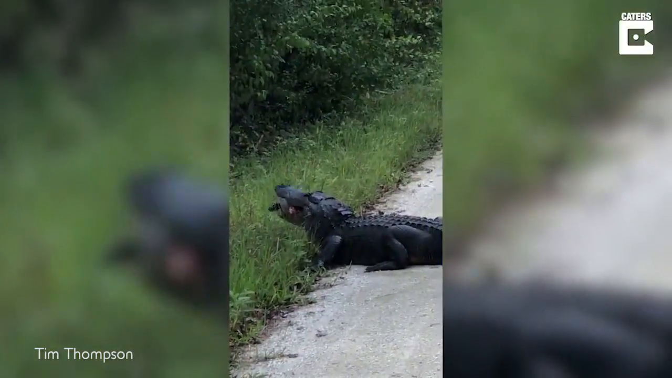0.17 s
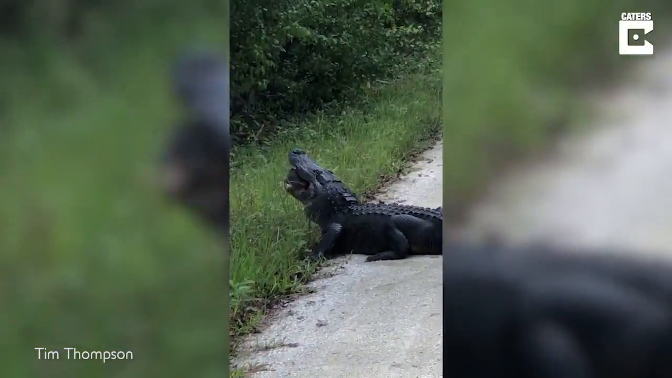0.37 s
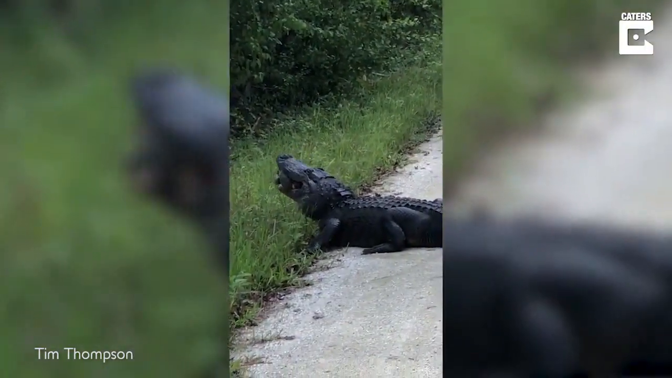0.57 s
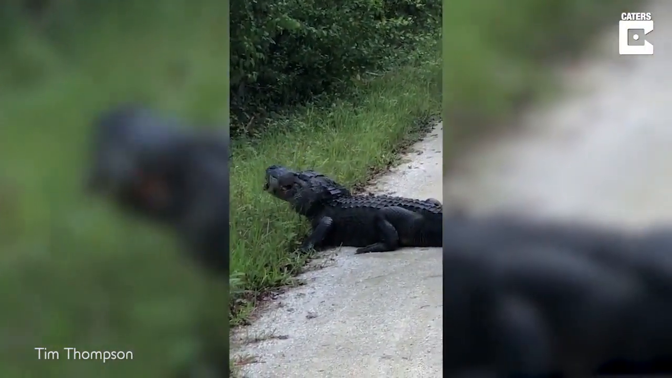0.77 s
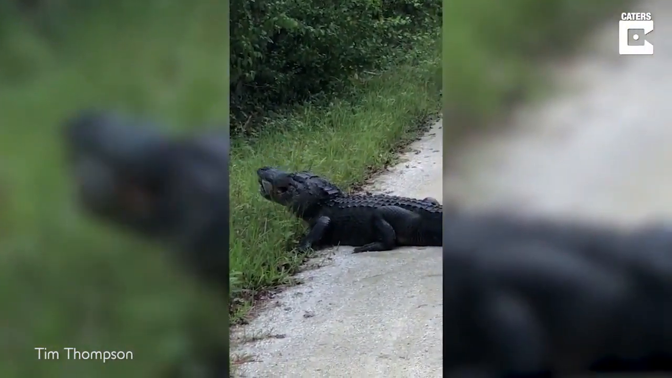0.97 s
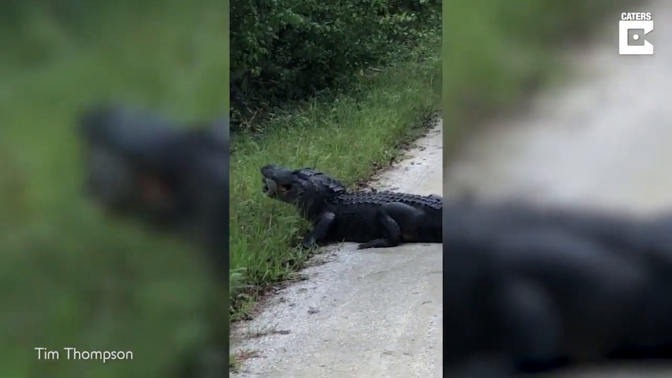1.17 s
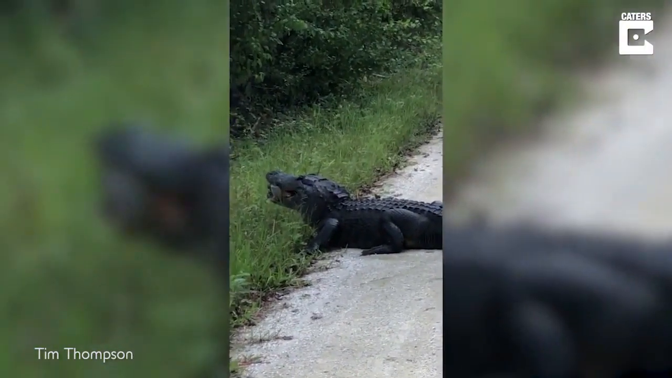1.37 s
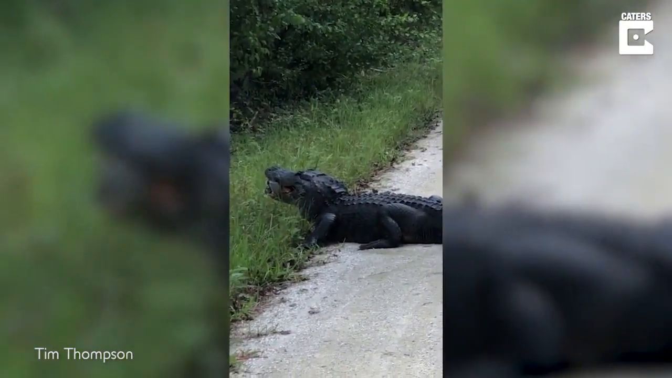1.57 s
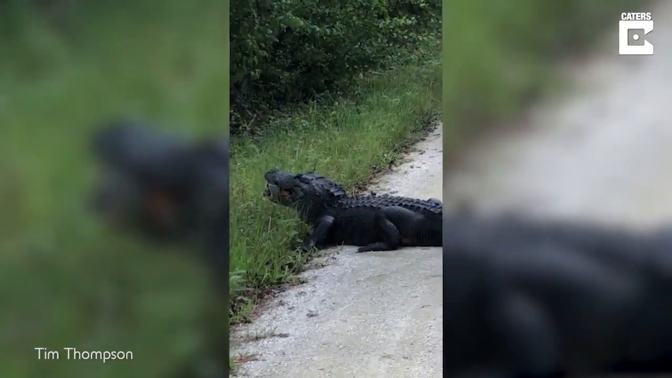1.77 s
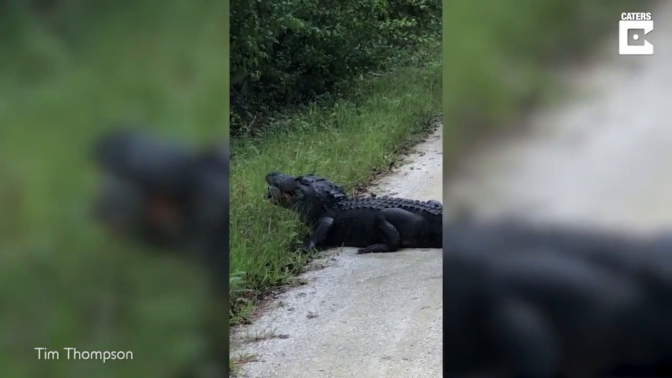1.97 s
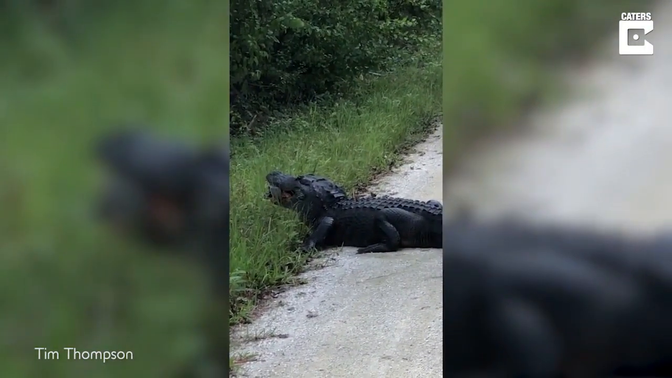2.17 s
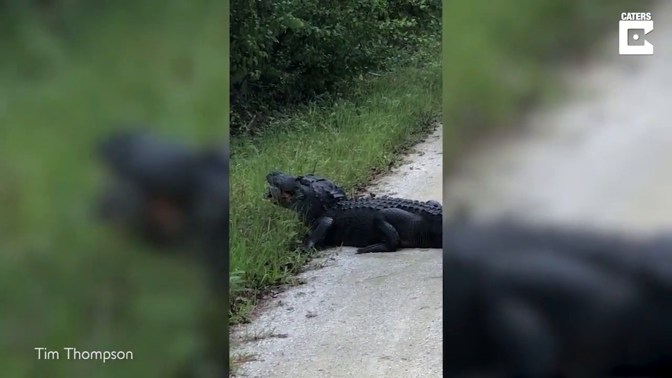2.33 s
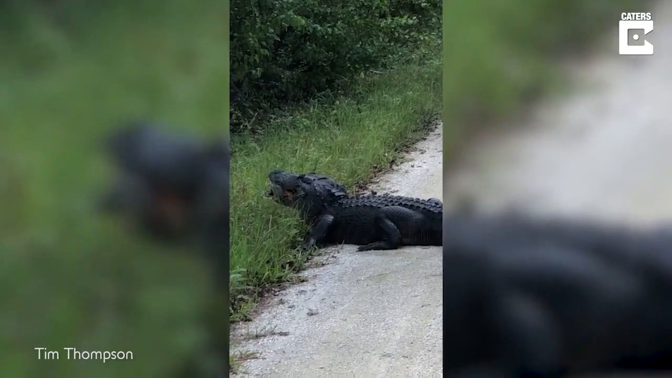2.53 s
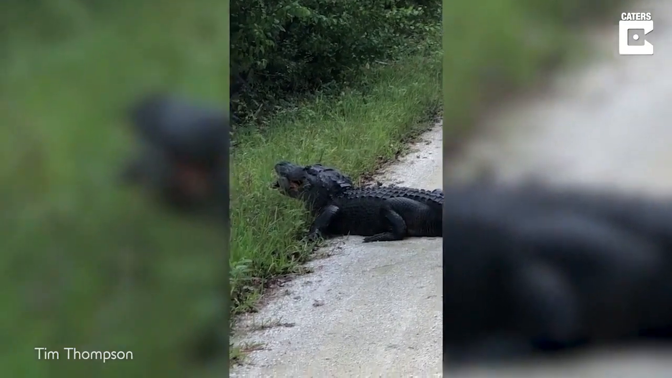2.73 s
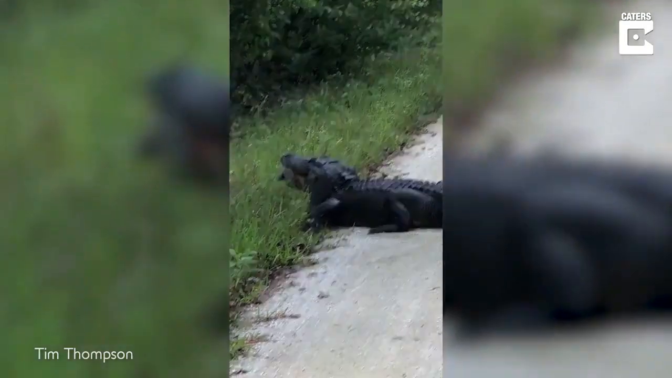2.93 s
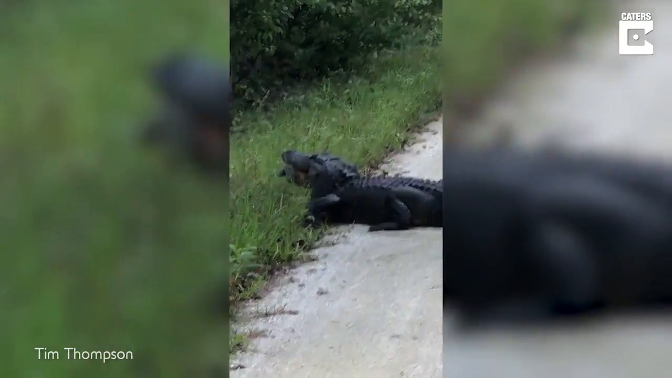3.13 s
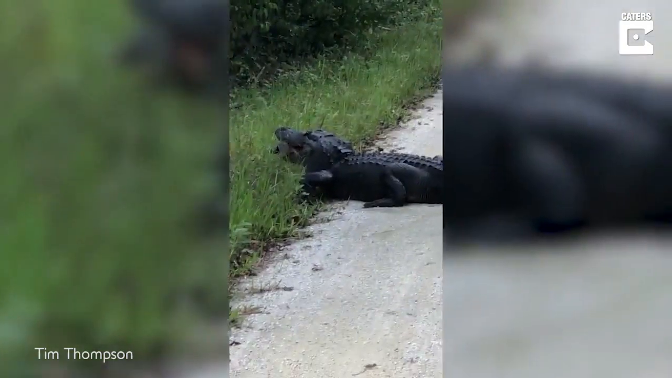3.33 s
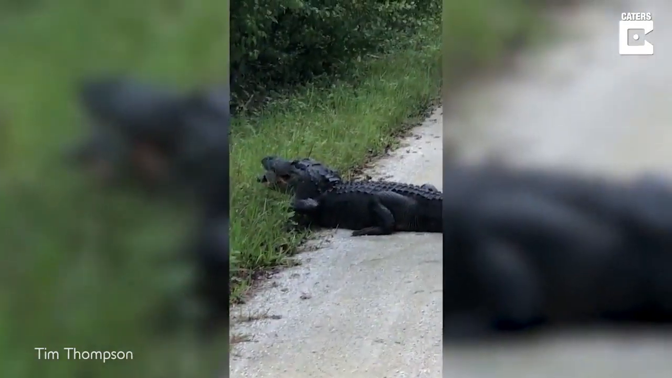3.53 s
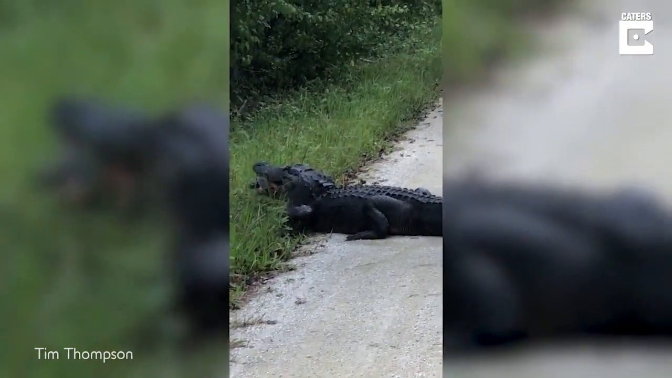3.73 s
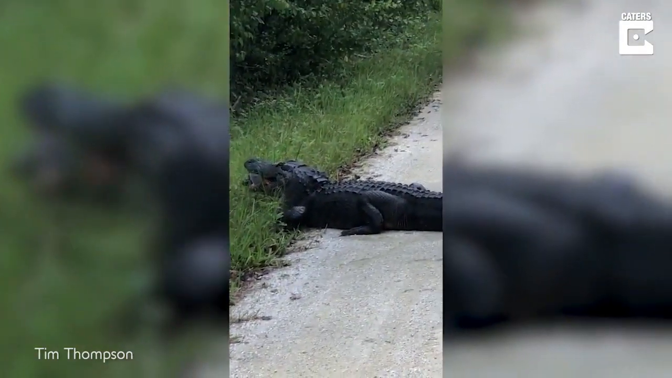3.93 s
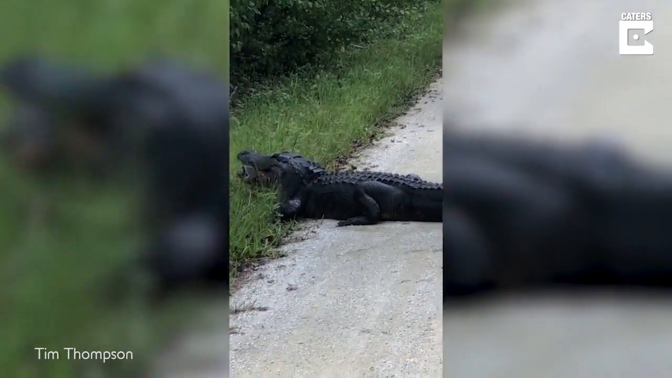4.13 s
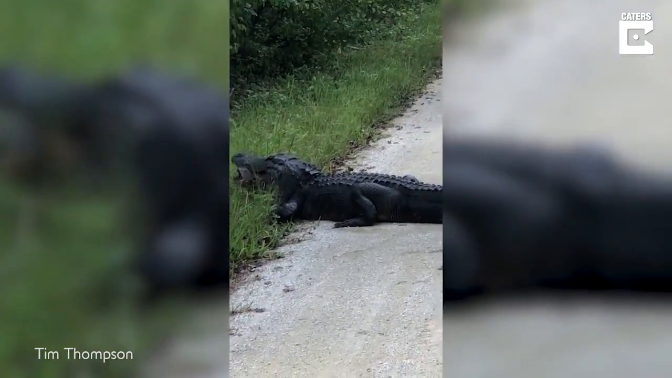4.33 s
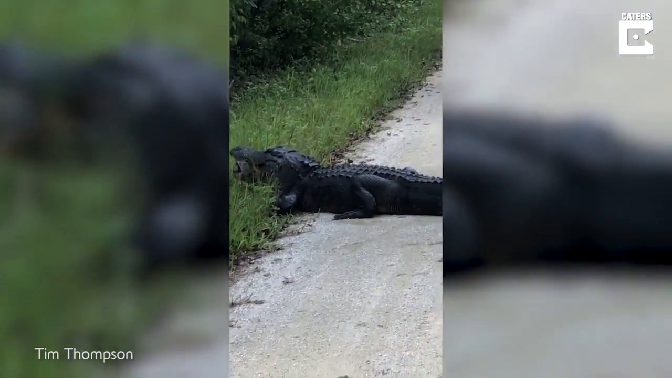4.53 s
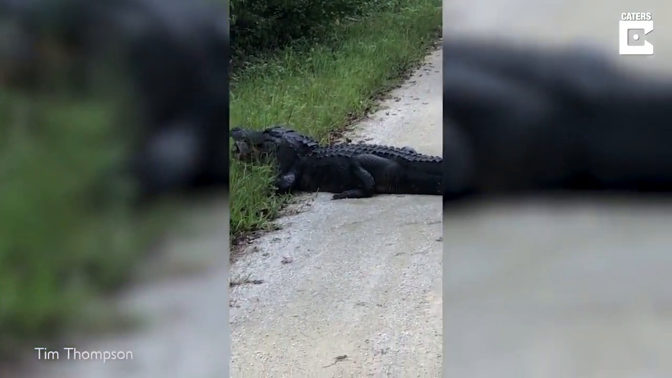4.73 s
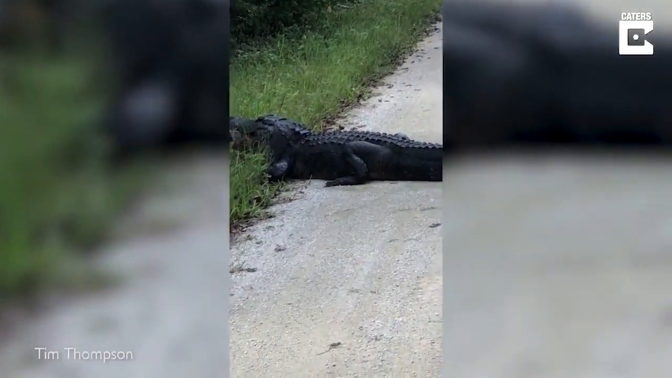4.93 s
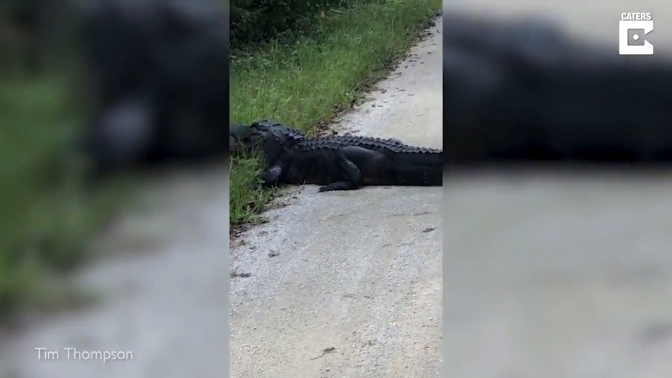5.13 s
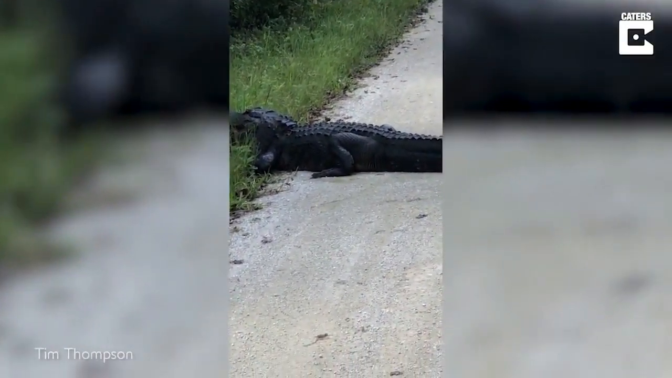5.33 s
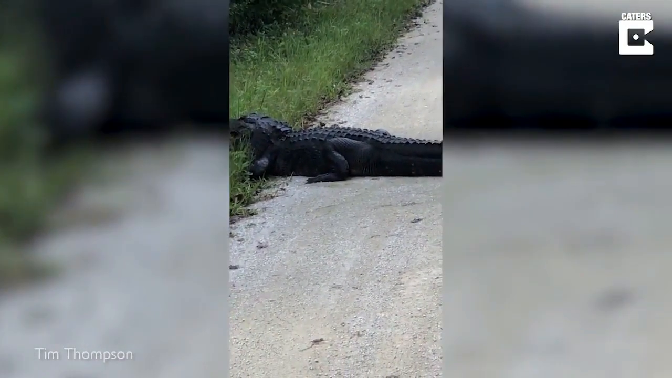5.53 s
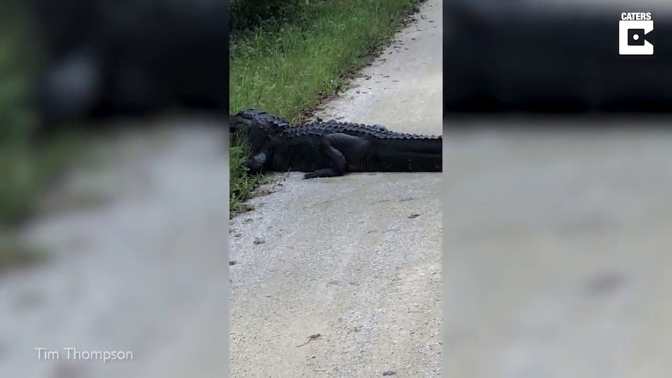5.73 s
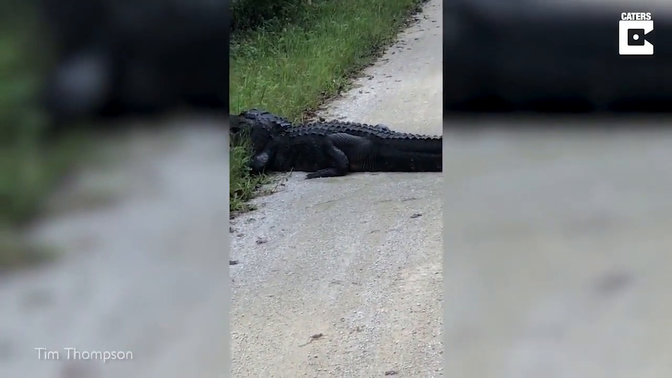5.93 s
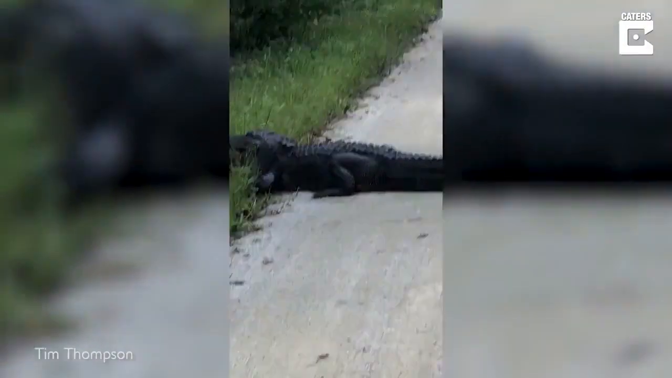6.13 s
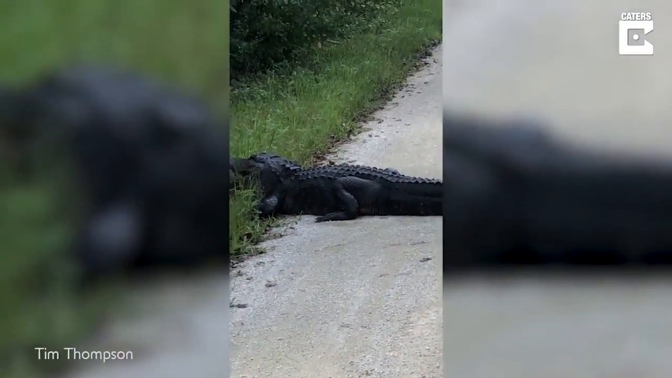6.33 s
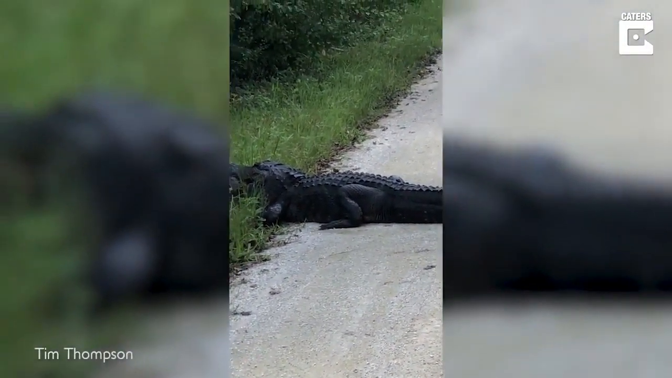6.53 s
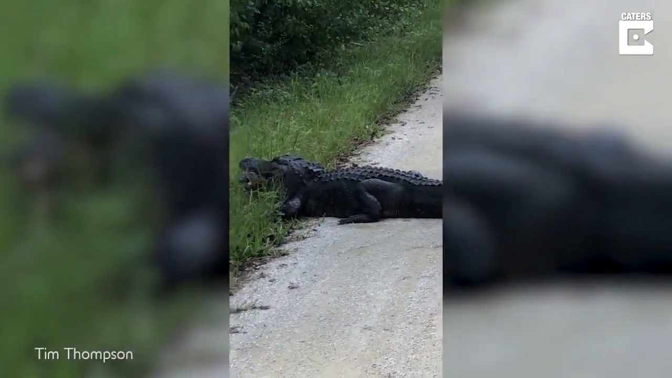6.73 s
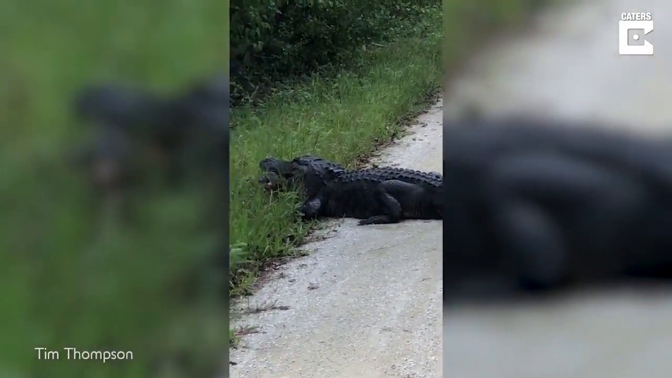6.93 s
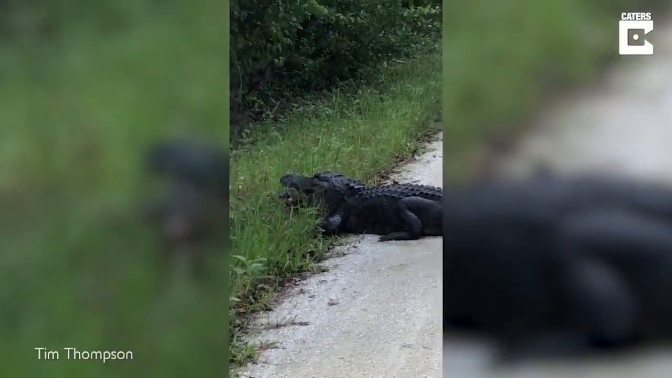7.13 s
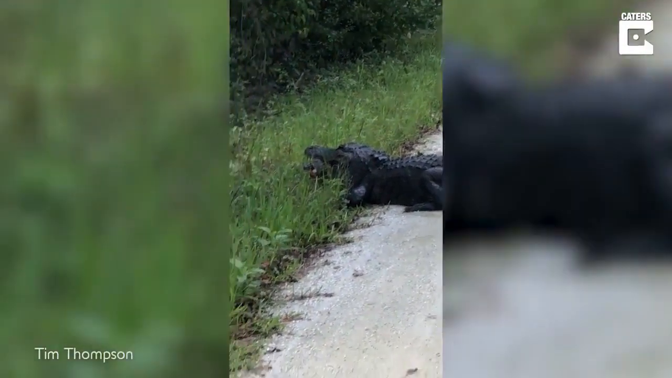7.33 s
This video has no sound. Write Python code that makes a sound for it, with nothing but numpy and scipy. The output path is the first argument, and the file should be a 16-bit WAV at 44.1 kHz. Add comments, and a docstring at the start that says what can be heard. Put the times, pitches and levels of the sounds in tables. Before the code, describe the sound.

Outdoors on a gravel roadside, an alligator bites through a turtle shell: a few small ticks, then a very sharp loud crack and a second hollower crunch with splintering debris, both thrown back briefly by nearby trees. Afterwards only a quiet car idle remains, low throb, soft clatter and fan roar, with a short faint grass rustle. The engine is close to the microphone; the animal is a little farther away.

```python
"""An alligator on a gravel roadside bites through a turtle shell: small snaps, then two hard cracks
that the trees throw back. Noise bursts ring shell modes, a pulse rings the hollow, a noise tail echoes.
Grass rustles later as band-split random grains; a few stalks snap as short noise bursts.
A six-cylinder car idles close by: cosine exhaust throb, ringing valve-gear clatter, shaped-noise
fan roar and a lone swept hum."""
import sys
import numpy as np
from scipy import signal
from scipy.fft import rfft, irfft, next_fast_len
from scipy.io import wavfile

SR = 44100
rng = np.random.default_rng(int(sys.argv[2]) if len(sys.argv) > 2 else 0)


def log_audio(samples):
    """Write samples as a 16-bit WAV file to the path given in sys.argv[1]."""
    # one column per channel
    frames = np.atleast_2d(samples).T
    # limit to full scale, then quantise
    limited = np.clip(frames, -1, 1)
    pcm = np.round(limited * 32767).astype(np.int16)
    wavfile.write(sys.argv[1], SR, pcm)


N = 325899


def from_db(db):
    """dB to gain."""
    return 10 ** (np.asarray(db) / 20)


def rms_one(x):
    """Scale to rms 1."""
    return x / np.sqrt(np.mean(x ** 2) + 1e-20)


def peak_one(x):
    """Scale to peak 1."""
    return x / np.abs(x).max()


def in_time(rows):
    """Columns of a curve table, interpolated at every sample."""
    row_s, *columns = np.transpose(rows)
    return [np.interp(np.arange(N) / SR, row_s, column) for column in columns]


def drift(rate_hz):
    """Slow random wander of spread 1: low-passed noise at SR / 40, interpolated."""
    pole = np.exp(-80 * np.pi * rate_hz / SR)
    noise = rng.standard_normal(N // 40 + 2002)
    slow = signal.lfilter([1], [1, -2 * pole, pole * pole], noise)[2000:]   # drop the run-in
    return np.interp(np.arange(N) / 40, np.arange(len(slow)), rms_one(slow))


def ring(clicks, hz, t60_s):
    """Two-pole resonator: a unit click sets a decaying sine of height 1 ringing."""
    radius = 10 ** (-3 / (t60_s * SR))
    angle = 2 * np.pi * hz / SR
    feedback = [1, -2 * radius * np.cos(angle), radius * radius]
    return signal.lfilter([0, np.sin(angle)], feedback, clicks + 1e-18)


def coloured(x, spectrum, peaks=()):
    """Give x a spectrum, straight in dB over log frequency, with resonance peaks on top; rms 1."""
    size = next_fast_len(N)
    bins_hz = np.arange(size // 2 + 1) * SR / size + 1
    curve_hz, curve_db = np.transpose(spectrum)
    power = from_db(2 * np.interp(np.log(bins_hz), np.log(curve_hz), curve_db))
    for hz, width_hz, db in peaks:
        power += from_db(2 * db) / (1 + (2 * (bins_hz - hz) / width_hz) ** 2) ** 2
    return rms_one(irfft(rfft(x, size) * np.sqrt(power), size)[:N])


def band_pass(x, low_hz, high_hz):
    """Second-order Butterworth band."""
    return signal.sosfilt(signal.butter(2, [low_hz, high_hz], "band", fs=SR, output="sos"), x)


# Shell plate modes. Each row: nominal frequency in Hz, relative level in dB, t60 in seconds.
SHELL_MODES = [(1420, -1.5, 0.0052), (1720, -8.5, 0.014), (2470, -5, 0.0078), (3260, -3.5, 0.0077),
               (3775, 1, 0.0047), (4170, -1, 0.0015), (5240, -1, 0.0036), (5500, -0.5, 0.00313),
               (7080, 4, 0.0035), (9200, -1, 0.003), (11600, 1.5, 0.001), (13500, 1, 0.00155)]
MODE_SPREAD = 0.02   # share by which each break shifts the modes, as it loads the plates differently
TEAR_S = 0.0001   # time constant of fracture build-up


def shell_snap(t, centre_hz, length_s, fall_db):
    """A fracture is a short burst of breaks that rings the plate modes near its centre; peak 1."""
    fracture = (1 - np.exp(-t / TEAR_S)) * np.exp(-(t / max(1.5 * length_s, 1e-4)) ** 2)
    breaks = rng.standard_normal(len(t)) * fracture
    shift = 1 + MODE_SPREAD * rng.standard_normal(len(SHELL_MODES))
    modes = 0
    for k, (hz, level_db, t60_s) in enumerate(SHELL_MODES):
        gain = from_db(level_db - fall_db * abs(np.log2(hz / centre_hz)))
        modes = modes + gain * peak_one(ring(breaks, hz * shift[k], t60_s)) * (-1) ** k
    bare_crack = signal.lfilter([1, 0, -1], [1, 0, .1], breaks)   # adds even treble
    return peak_one(peak_one(modes) + from_db(-3 - fall_db) * bare_crack)


# Air modes inside the shell. Each row: frequency in Hz, relative drive in dB, t60 in seconds.
HOLLOW_MODES = [(633, 10, 0.045), (580, 8, 0.032), (874, 3.5, 0.032), (1180, -3, 0.0098), (1400, 0, 0.014),
                (490, -9, 0.025), (361, 0, 0.049)]
HOLLOW_LAG_S, HOLLOW_SWELL_S = 0.00153, 0.0025   # answers after the first break; swell time constant


def shell_hollow(t):
    """The hollow booms when the plate gives way: one pressure pulse rings the air modes; peak 1."""
    release = np.exp(-((t - HOLLOW_LAG_S) / 0.000073) ** 2)
    push = np.diff(release, prepend=0)
    boom = sum(from_db(level_db) * ring(push, hz, t60_s) for hz, level_db, t60_s in HOLLOW_MODES)
    swell = 1 - np.exp(-np.maximum(t - HOLLOW_LAG_S, 0) / HOLLOW_SWELL_S)
    return peak_one(boom * swell)


# Fractures. Each row: start in seconds, snap peak in dB, snap centre in Hz, burst length in seconds
# (before a stretch of 1.5), fall-off from the centre in dB per octave, hollow against snap peak in dB,
# click sent to the trees against snap peak in dB.
BITES = [(.5222, -54, 5000, 0.00067, 18, -10, -12), (.5434, -62, 8000, 0.0008, 14, -25, -22),
         (0.553, -50, 3050, 0.0013, 20, -25, -17), (0.5779, -33, 3830, 0.00043, 15, -9, -22.5),
         (.5866, -45.5, 3380, 0.00097, 21, -2, -23), (.5897, -45, 3600, 0.0008, 19, -11, -32),
         (0.6884, -50, 6170, 0.00062, 36, -28, -13), (.781, -51, 3400, 0.0023, 22, -30, -28),
         (0.797, -27, 3400, 0.0007, 19, -15.5, -19.5), (.8064, -39, 2940, 0.0029, 21, -9, -30),
         (.8125, -40, 3600, 0.0022, 16, -17, -20), (.8172, -29.5, 3500, 0.00084, 12, -14, -23),
         (.822, -39, 3500, 0.00067, 14, -13, -31), (0.8386, -29.5, 5000, 0.0014, 9, -36, -18.5),
         (0.8493, -31, 3700, 0.00058, 12, -30, -21), (0.8561, -9.5, 3170, 0.0003, 12.5, -21.5, -26.5),
         (.8635, -39, 5400, .002, 20, -30, -28), (0.858, -29, 2600, 0.00086, 20, -30, -30),
         (0.8661, -29, 2550, 0.0021, 34, -28, -17.5), (.8742, -17.5, 3280, 0.0017, 14.5, -34, -45),
         (.8775, -29.5, 1740, 0.0032, 12, -8.5, -28), (0.8865, -29, 3400, 0.0015, 12, -34, -39),
         (0.8973, -32.5, 6500, 0.0011, 18, -28, -10), (0.901, -34, 2300, 0.001, 16, -30, -33.5),
         (0.9087, -31, 2200, 0.00074, 11, -25, -29), (.915, -38, 3800, 0.00072, 13, -17, -35),
         (0.92, -34.5, 2500, 0.00091, 13, -7, -35), (0.9612, -19.5, 3370, 0.0012, 11, -11.5, -41),
         (0.964, -17, 5000, 0.0018, 12, 0.5, -17), (0.9737, -24.5, 2400, 0.0015, 19, -31, -18),
         (0.9798, -26, 2000, 0.0034, 17, -31, -17), (0.985, -32, 1610, 0.0016, 21, -17, -28),
         (0.9897, -37, 1500, 0.0028, 11, -13, -19), (0.997, -33, 1700, 0.0024, 26, -28, -33),
         (1.001, -39, 2300, 0.0022, 9, -19, -34), (1.005, -32, 1500, 0.0018, 23, -15, -30),
         (1.0102, -33, 1400, 0.003, 22, -25, -22), (1.015, -39, 1800, 0.0015, 12, -25, -35),
         (1.023, -36, 1480, 0.002, 23, -27, -33), (1.04, -44, 2500, .002, 20, -23, -26),
         (1.063, -39, 1590, 0.0036, 18, -23, -26), (1.147, -44, 3130, 0.0029, 32, -39, -44),
         (7.3143, -52, 1400, 0.0005, 20, -1, -30)]
HOLLOW_ECHO_DB = -23.5   # extra drop in dB for the hollow sent to the trees, on top of the row's click and hollow levels


def bites():
    """Each fracture snaps the shell, the hollow answers a moment later, and both return from the trees."""
    direct, to_trees, span = np.zeros(N + SR), np.zeros(N + SR), SR // 5
    t = np.arange(span) / SR
    for start_s, db, centre_hz, length_s, fall_db, hollow_db, echo_db in BITES:
        snap = shell_snap(t, centre_hz, length_s, fall_db)
        hollow = shell_hollow(t)
        at = round(start_s * SR)
        direct[at:at + span] += from_db(db) * (snap + from_db(hollow_db) * hollow)
        to_trees[at] += from_db(db + echo_db)   # bare click: scattering blurs the pitch of the snap
        to_trees[at:at + span] += from_db(db + echo_db + hollow_db + HOLLOW_ECHO_DB) * hollow
    return direct[:N] + trees(to_trees)


# Echo in octave bands. Each row: band centre in Hz, relative starting level in dB, t60 in seconds.
TREE_BANDS = [(310, -25, 0.0884), (735, -25.5, 1), (1450, -12.5, 0.71), (2390, -9.5, 0.55),
              (5330, -7, 0.52), (10300, -13, 0.39), (14000, -38, .3)]


def trees(x):
    """Scattered returns from trunks and leaves: strongest from the near brush, dying band by band."""
    t, tail = np.arange(SR) / SR, 0
    for hz, db, t60_s in TREE_BANDS:
        returns = rng.standard_normal(SR) * from_db(4.0 * drift(90)[:SR])
        band = band_pass(returns, hz / np.sqrt(2), hz * np.sqrt(2))
        tail = tail + from_db(db - 60 * t / t60_s) * rms_one(band)
    onset = 1 - np.exp(-t / 0.0014)
    near_brush = 1 + np.exp(-t / 0.0064)
    return signal.fftconvolve(x, tail * onset * near_brush)[:N]


# The body shifts in the grass. Each row: time in seconds, gain on the crackle in dB,
# treble lift about 6500 Hz in dB per octave.
RUSTLE = [(2.85, -89, 1), (3.3, -80, -1), (3.47, -77, 2), (3.51, -69.5, -2), (3.56, -71, -1), (3.6, -71, 1),
          (3.65, -70, -0.5), (3.71, -72, 0.5), (3.745, -78, 0.5), (3.775, -68, 5), (3.81, -73, 5),
          (3.85, -69.5, 6), (3.89, -74, 3), (3.92, -84, -1), (3.99, -81, -1), (4.025, -72, -1.5),
          (4.07, -70, -2), (4.11, -75, -4), (4.135, -70, -3.5), (4.153, -74, -1), (4.175, -67, -1),
          (4.22, -80, 1), (4.45, -92, -1)]
# Crackle spectrum. Each row: frequency in Hz, relative density in dB per Hz.
CRACKLE_SPECTRUM = [(1500, 8.5), (3000, 6), (5000, 4), (7000, 5.5), (11600, 1.5), (16000, -6)]
# Edges in Hz of the bands that flutter independently.
FLUTTER_EDGES_HZ = (1000, 4000, 6500, 9500, 13000, 18000)
FLUTTER_DB = 2.8   # rms spread


def rustle():
    """Dense fine crackle under the moving body: random grains, gated and fluttering band by band."""
    grains = from_db(1.6 * np.minimum(rng.exponential(1, N), 4)) * rng.standard_normal(N)
    grains_per_s = 11000 * from_db(1.5 * drift(25))   # blades slip in clumps
    grains *= rng.random(N) < grains_per_s / SR
    crackle = coloured(grains, CRACKLE_SPECTRUM)
    t = np.arange(N) / SR
    level_db, lift_db = in_time(RUSTLE)
    active = (t > RUSTLE[0][0]) * (t < RUSTLE[-1][0])
    out = 0
    for low_hz, high_hz in zip(FLUTTER_EDGES_HZ, FLUTTER_EDGES_HZ[1:]):
        moving = from_db(level_db + lift_db * np.log2(low_hz / 6500)) * active
        band = band_pass(crackle, low_hz, high_hz)
        out = -out + moving * from_db(FLUTTER_DB * drift(15)) * band   # signs alternate: neighbours join
    return out


# Single stalks. Each row: start in seconds, burst peak before the band filter in dB.
STALKS = [(0.107, -59), (3.4914, -67), (3.763, -52), (3.78, -56), (4.0326, -60), (4.0654, -63),
          (4.1134, -68), (4.1445, -58), (4.1617, -51), (4.9855, -60), (6.6598, -56)]
STALK_LOW_HZ, STALK_HIGH_HZ = 5500, 12500


def stalks():
    """Each stalk snaps as a decaying burst of random-sign clicks, band-passed."""
    clicks = np.zeros(N)
    decay = np.exp(-np.arange(200) / SR / 0.0018)
    for start_s, db in STALKS:
        at = round(start_s * SR)
        clicks[at:at + 200] = from_db(db) * rng.choice([-1, 1], 200) * decay
    return band_pass(clicks, STALK_LOW_HZ, STALK_HIGH_HZ)


# Idle speed. Each row: time in seconds, crank speed in rpm.
IDLE_SPEED = [(0.0, 624.4), (1.68, 629.9), (2.02, 631.9), (2.69, 625.7), (3.19, 628.8), (3.36, 637.9),
              (3.86, 636.6), (4.03, 626.7), (4.7, 621.0), (5.04, 635.5), (5.54, 616.9), (6.05, 634.4),
              (6.55, 623.7), (7.39, 632.4)]


def cam_turns():
    """Turns of the cam, which runs at half crank speed."""
    return np.cumsum(in_time(IDLE_SPEED)[0]) / (120 * SR)


# Throb frequencies as multiples of the cam rate.
EXHAUST_ORDERS = (6, 9, 12, 15, 16, 17, 18, 21, 24, 27, 42, 58, 68)
# Level of each multiple in dB rms, about which it wavers.
EXHAUST_DB = [-74, -81, -86, -57, -99, -109, -59, -67, -80.5, -91, -100, -78.5, -77]
PUFF_DEG = 45.13   # cam angle of an exhaust puff


def exhaust(cam):
    """Throb: cosines at multiples of the cam rate, in phase at the puff; higher ones waver more."""
    out = 0
    for order, db in zip(EXHAUST_ORDERS, EXHAUST_DB):
        gain = np.sqrt(2) * from_db(db + order / 15 * drift(4))
        out = out + gain * np.cos(2 * np.pi * order * (cam - PUFF_DEG / 360))
    return out


# Ringing engine parts. Each row: frequency in Hz, t60 in seconds, knocks as pairs of cam angle in
# degrees and mean level in dB.
ENGINE_PARTS = [(953, 0.11, [(105, -66), (225, -65.5), (345, -65.5)]), (1147, 0.33, [(12, -68),
                (132, -70.5), (312, -67.5)]), (1244, 0.2, [(0.1, -70), (52, -64.5), (297, -65)]),
                (1742, 0.032, [(10, -70), (58, -68), (258, -65), (300, -67), (345, -70)]),
                (1796, 0.089, [(10, -66), (58, -66), (265, -62), (300, -66), (345, -85)]),
                (4960, 0.0067, [(45, -68), (108, -62), (165, -60.5), (240, -63.5), (285, -74), (350, -81)])]
KNOCK_SPREAD_DB = 1.6


def valve_gear(cam):
    """Clatter: knocks at fixed cam angles, random in sign and level, set engine parts ringing."""
    out = np.zeros(N)
    for hz, t60_s, knocks in ENGINE_PARTS:
        clicks = np.zeros(N)
        for deg, db in knocks:
            at = np.flatnonzero(np.diff(np.floor(cam - deg / 360)))
            height = from_db(db + rng.normal(0, KNOCK_SPREAD_DB, len(at)))
            clicks[at] = height * rng.choice([-1, 1], len(at))
        out += ring(clicks, hz, t60_s)
    return out


# Roar spectrum. Each row: frequency in Hz, relative density in dB per Hz.
ROAR_SPECTRUM = [(18, -39), (30, -18), (60, -17.5), (90, -7.5), (130, -11), (170, -17.5), (340, -19),
                 (405, -26), (600, -20), (1050, -27.5), (1400, -30), (2200, -33.5), (3900, -37.5),
                 (7000, -42), (10200, -49.5), (13600, -49.5), (16500, -58)]
# Body panels and ducts that the roar excites. Each row: frequency in Hz, width at -6 dB in Hz,
# relative density in dB per Hz.
PANELS = [(478, 85, -17.5), (669, 82, -21), (835, 27, -39), (1520, 46, -27.5), (1754, 270, -26),
          (2690, 44, -30), (3190, 78, -30), (3486, 120, -30.5), (2830, 1100, -36.5), (4490, 86, -31),
          (5070, 1230, -37.5)]
ROAR_DB = -58   # rms before drift and pulsing


def fan_roar(cam):
    """Broad shaped noise with panel resonances, drifting slightly; every second firing lifts it."""
    pulsing = 1 + 0.11 * np.cos(6 * np.pi * (cam - .02))
    level = from_db(ROAR_DB + 0.15 * drift(4.2))
    return level * pulsing * coloured(rng.standard_normal(N), ROAR_SPECTRUM, PANELS)


def engine():
    """Throb, clatter and roar locked to one cam angle."""
    cam = cam_turns()
    return exhaust(cam) + valve_gear(cam) + fan_roar(cam)


# Hum of its own speed, likely an electric fan. Each row: time in seconds, level in dB rms.
HUM_LEVEL = [(0.0, -62.5), (0.4, -78), (0.75, -79), (1.05, -74), (1.8, -65.5), (2.05, -73), (2.6, -69),
             (3.36, -56), (3.72, -52.5), (4.2, -72.5), (4.7, -59), (5.04, -64.5), (5.3, -59.5), (5.72, -77),
             (6.05, -62), (6.6, -62), (7.05, -74), (7.39, -80)]
HUM_HZ, HUM_SLOWS_AT_S, HUM_SAG_HZ_PER_S = 120.35, 3.7, 0.47   # steady, then it slows


def hum():
    """A lone sine that swells and fades and later sags in pitch."""
    hz = HUM_HZ - HUM_SAG_HZ_PER_S * np.maximum(np.arange(N) / SR - HUM_SLOWS_AT_S, 0)
    phase = 2 * np.pi * np.cumsum(hz) / SR
    return np.sqrt(2) * from_db(in_time(HUM_LEVEL)[0]) * np.sin(phase)


def scene():
    """All sources summed to one channel."""
    return (bites() + rustle() + stalks() + engine() + hum())[None]


CUTOFF_HZ = 16700   # stop-band edge, 70 dB down


def record(dry):
    """The top is cut by a steep low-pass."""
    return signal.sosfilt(signal.cheby2(12, 70, CUTOFF_HZ, fs=SR, output="sos"), dry)


dry = scene()
out = record(dry)
log_audio(out)
```